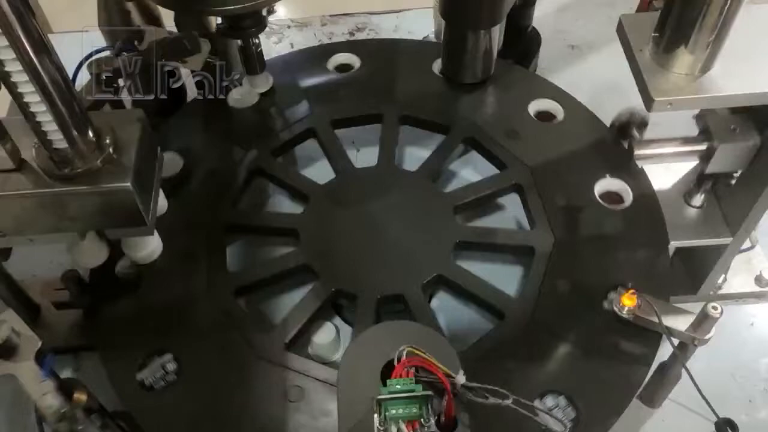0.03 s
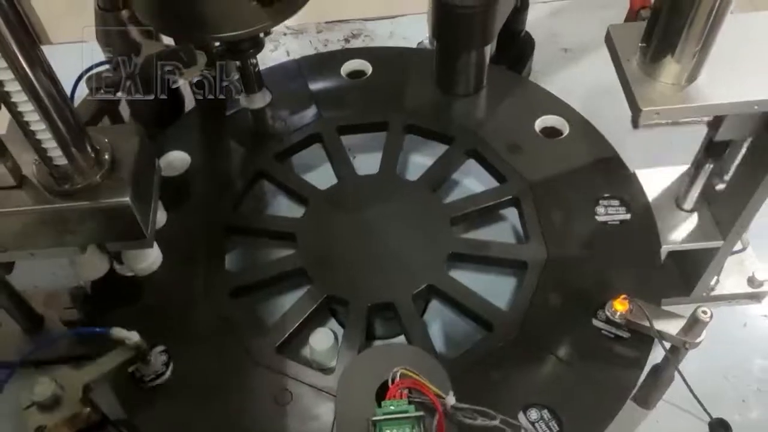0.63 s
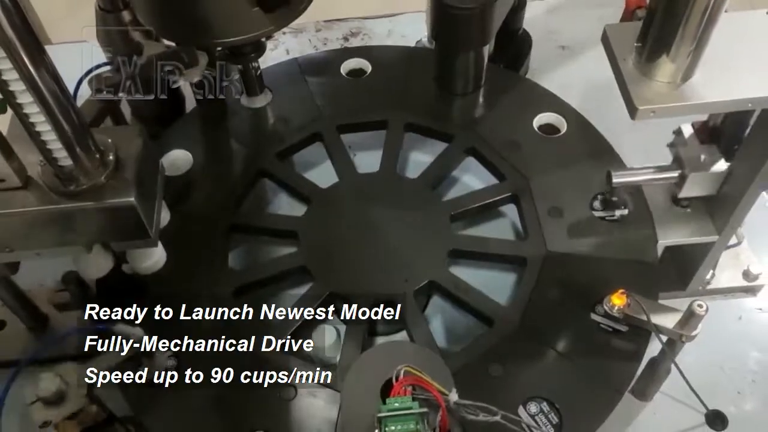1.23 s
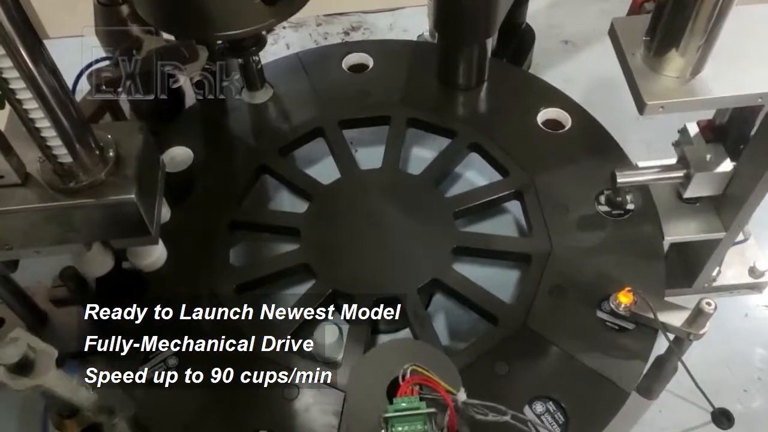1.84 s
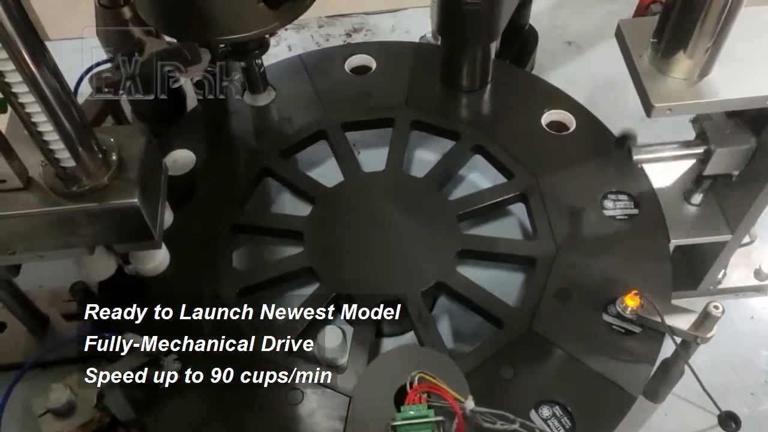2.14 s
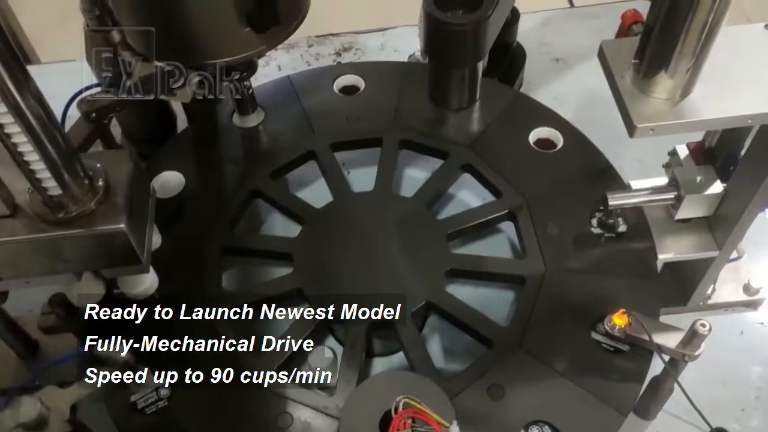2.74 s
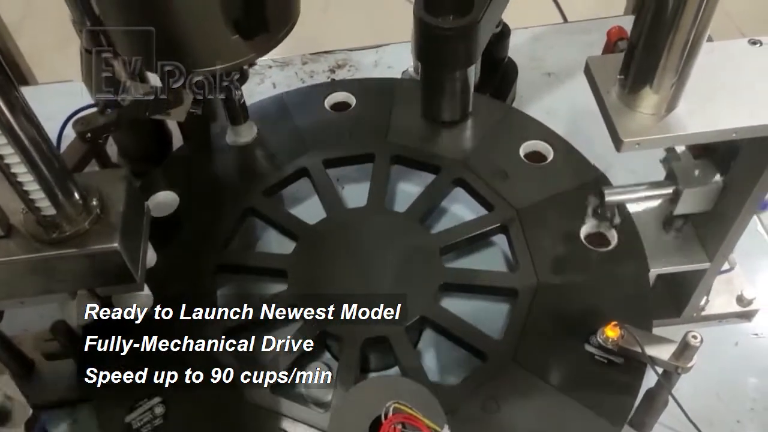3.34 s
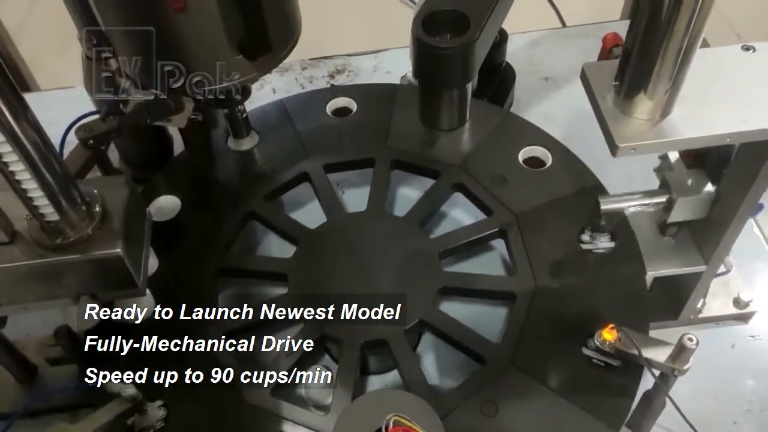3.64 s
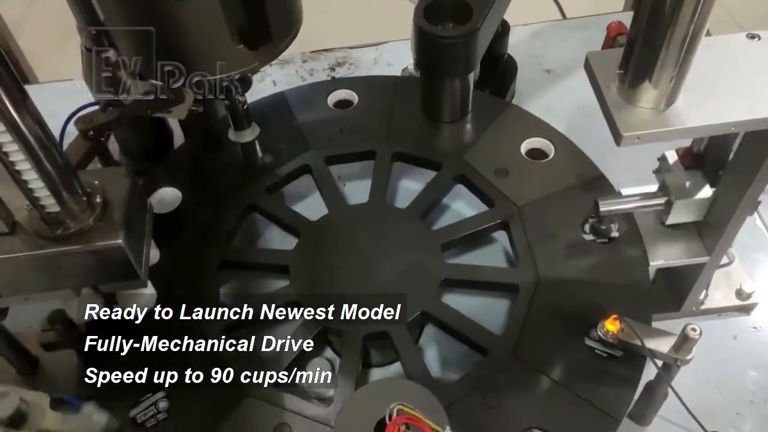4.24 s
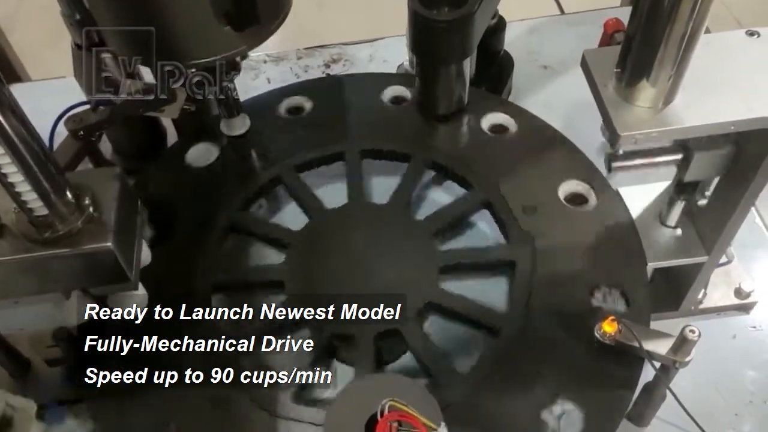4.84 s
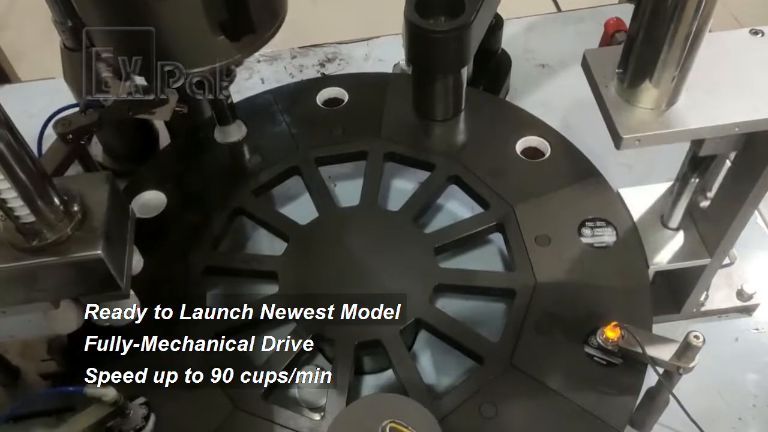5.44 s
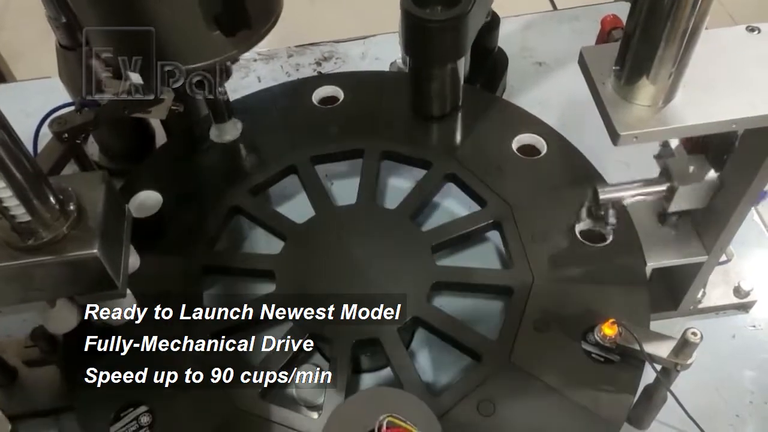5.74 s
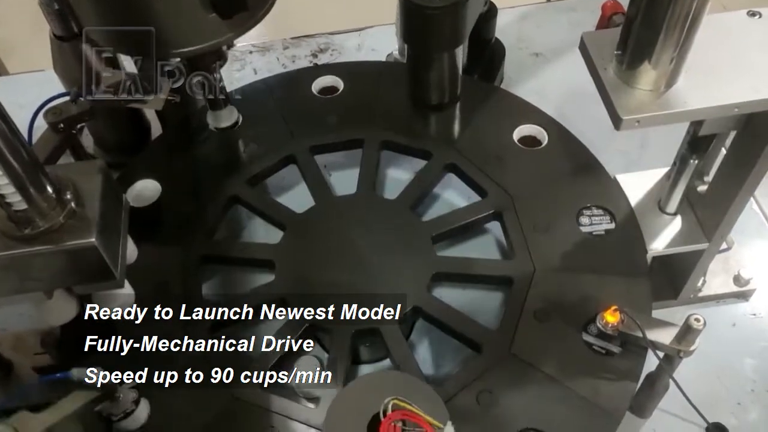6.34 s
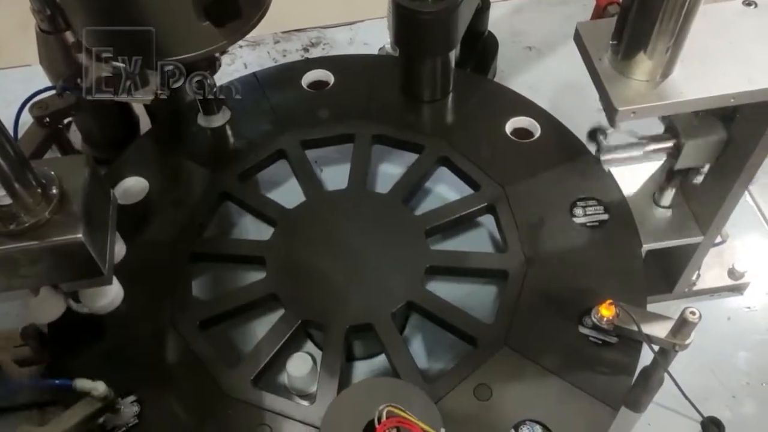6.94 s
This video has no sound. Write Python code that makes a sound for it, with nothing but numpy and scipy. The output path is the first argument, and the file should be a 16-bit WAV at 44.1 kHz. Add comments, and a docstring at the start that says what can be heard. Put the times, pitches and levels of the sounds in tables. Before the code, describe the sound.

A rotary packing machine runs close to the microphone in a factory hall. A little faster than once a second, its steel turntable locks with a rattling, ringing clack, the tools come down with a dull clunk, and a short burst of air follows. The motor and gears whirr steadily underneath. Small knocks, pings and a few brief squeaks fall between the beats, and two hollow pops stand out early on.

```python
"""Rotary capsule packing machine

Close up in a factory hall, the machine steps round about every 0.8 s: a rattling, ringing clack as the
turntable locks, a dull clunk as the tools come down, then a burst of air. Underneath, the drive whirrs
through the steel frame. Cams knock, a small part pings, a guide squeaks, twice something hollow pops."""
import sys
import numpy as np
from scipy import signal
from scipy.fft import rfft, irfft
from scipy.io import wavfile
from scipy.ndimage import uniform_filter1d

SR = 44100
rng = np.random.default_rng(int(sys.argv[2]) if len(sys.argv) > 2 else 0)


def pcm_store(signal):
    """Save signal as 16-bit PCM."""
    levels = np.round(np.clip(np.atleast_2d(signal), -1, 1) * 32767)
    wavfile.write(sys.argv[1], SR, levels.astype(np.int16).T)


N = 313110
TIME = np.arange(N) / SR
CYCLE_S = 0.7935  # one turn of the camshaft

# fade-in of the whole mix: (t/s, level/dB)
FADE_IN = [(.148, -20.5), (.2, -8), (.29, -5), (.34, -1.5), (.42, 0.5)]
# decay of the hall: (f/Hz, t60/s)
HALL_DECAY = [(150, 0.43), (500, 0.5), (1000, 0.46), (3000, 0.35), (9000, 0.05)]
# deep shaking of the floor: (t/s, relative level/dB)
FLOOR_SHAKE = [(0.3, -74), (1.76, -64), (1.8, -81), (2.14, -66.5), (2.29, -85.5), (2.69, -63), (3.18, -68),
               (4.56, -54), (5.3, -74), (5.9, -76), (7.1, -65)]
# motor and gear tones: (f/Hz, level/dB)
MOTOR_TONES = [(402, -52.5), (554, -50), (2566, -79), (2807, -56.5), (4151, -57.5)]
# load on the drive through a cycle: (t/s after the lock, whirr level/dB, sliding level/dB)
DRIVE_LOAD = [(.02, -36, -36.5), (.13, -36, -37.5), (.23, -38.5, -39.7), (.29, -38.5, -37),
              (.325, -36.5, -37.5), (.38, -38, -40), (.48, -37, -39), (.6, -39.5, -41.5),
              (.69, -39.5, -41.5), (.76, -39, -40)]
# slow drift of the whirr: (t/s, gain/dB)
GEAR_DRIFT = [(.4, 1.1), (.65, 1.5), (1, 1), (1.55, 0.5), (2.2, -0.5), (2.6, 1.8), (2.95, 1), (3.4, 1.5),
              (3.9, 0.5), (4.2, 1), (5.2, 1.5), (5.7, -0.1), (6.3, -1.1), (7, 0)]
# tone colours of the gears and the sliding guides: (f/Hz, relative level/dB)
GEAR_EQ = [(29, -61), (50, -44.5), (70, -26), (108, -14), (155, -18), (198, -6.5), (277, -6.5), (398, -3),
           (428, -4), (531, -3.5), (680, -10.5), (710, -8.5), (821, -6), (1130, -12.5), (1600, -51),
           (2080, -50), (3520, -120)]
GUIDE_EQ = [(650, -14.5), (1100, -1), (1380, -1), (1510, 0), (2370, 2), (3830, 0), (4350, -1.5), (6770, -3),
            (9920, -21), (10600, -42), (11100, -81.5), (11500, -91), (15000, -101), (22000, -120)]
# tone colours of the air jet, its fizz and the rush in the pipe: (f/Hz, relative level/dB)
JET_EQ = [(120, -8.5), (210, 9.5), (330, 7), (800, 2.5), (1300, -6.5), (1700, -7), (2700, 0), (3700, -3.5),
          (4500, -4.5), (6900, 1.5), (7400, -10), (10000, -13), (11500, -43)]
FIZZ_EQ = [(3000, -40), (6500, -10), (7800, -1.5), (10000, 0), (11500, -13)]
PIPE_EQ = [(600, -28), (1300, -14), (1700, -4), (2700, -1.5), (3700, -8), (4500, -7.5), (6900, -7.5),
           (8000, -31), (11500, -55)]
# tone colours of the clunk and the clack: (f/Hz, relative level/dB)
CLUNK_EQ = [(59, -37.5), (100, -8.5), (373, 6), (743, 8.5), (1170, 0.5), (1450, -6.5), (1910, -5.5),
            (2520, -10.5), (3590, -15), (6600, -9.5), (8030, -44), (9400, -22), (11000, -74), (14300, -83),
            (22000, -120)]
CLACK_EQ = [(59, -56), (100, -38), (203, -21), (837, -5), (1990, -13.5), (2470, -10.5), (3120, -6),
            (3380, -15.5), (4110, -10.5), (7720, -15.5), (8190, -29), (9780, -23), (11000, -83),
            (14300, -88), (22000, -120)]
# resonances of the frame, air pipe, tool head and turntable: (f/Hz, width/Hz, gain/dB)
FRAME_PEAKS = [(115, 22, 2.5), (205, 40, 3), (256, 16, 2.5), (300, 14, 4), (345, 30, 2.5), (402, 30, 3),
               (522, 30, 4), (555, 22, 5), (712, 35, 3), (800, 70, 3), (1070, 50, 3)]
PIPE_PEAKS = [(1765, 55, 6), (2565, 90, 6.5), (2680, 90, -3), (2803, 60, 7.5), (4410, 70, 6), (4650, 60, 5)]
TOOL_PEAKS = [(408, 220, 6.5), (783, 110, 0.5), (1460, 86, 7.5), (2500, 110, 11.5), (6200, 460, -8),
              (6840, 170, 10)]
TURNTABLE_PEAKS = [(850, 160, 3), (1470, 150, 2), (1720, 150, 3), (2150, 120, -5), (2350, 70, 4),
                   (2520, 90, 4), (2750, 100, -4), (3170, 140, -10), (3360, 70, 6), (3490, 80, 5),
                   (3640, 100, -7), (3815, 70, 5), (4000, 100, -6), (4570, 90, 5), (4900, 90, 6),
                   (5300, 90, 5), (5520, 200, -6), (6150, 150, 3), (7500, 500, -8)]
# how far a narrow band may swell, least in the low drone: (f/Hz, multiple of the usual swing)
SWELL_CEILING = [(600, .7), (1500, 1.5)]
# a dry guide squeaks: (t/s, length/s, start f/Hz, end f/Hz, level/dB)
GUIDE_SQUEAKS = [(0.813, 0.04, 7940, 8360, -40), (1.624, 0.028, 8200, 8550, -40),
                 (5.57, 0.045, 7840, 8500, -35.5)]
# cams and cups knock on hollow parts: (t/s, ring level/dB, f/Hz, t60/s, scrape level/dB)
CAM_KNOCKS = [(.44, -29, 1490, 0.035, -36), (.602, -25.5, 805, 0.04, -40), (.645, -26, 1040, 0.076, -34.5),
              (0.7201, -30, 1170, 0.03, -33), (.801, -27, 920, 0.032, -37), (.85, -25, 846, 0.037, -42),
              (1.255, -31, 1280, 0.038, -38), (1.396, -37, 2600, .04, -49), (2.057, -26, 1015, 0.037, -41),
              (2.06, -28, 1790, .03, -42), (2.253, -28, 1096, 0.036, -43), (2.328, -27, 680, 0.023, -35),
              (2.331, -23, 1250, 0.032, -29.5), (2.682, -32, 836, 0.016, -41),
              (2.759, -22, 470, 0.023, -45), (2.959, -27, 1510, 0.023, -30),
              (2.967, -23, 1635, 0.034, -27.5), (3.188, -27, 817, 0.037, -38), (3.567, -26, 2640, .05, -43),
              (3.708, -31.5, 1780, .03, -44.5), (3.835, -26.5, 1084, 0.034, -39.5),
              (3.931, -22, 855, 0.013, -35), (4.392, -31, 985, 0.044, -48), (4.607, -27, 830, 0.03, -30.5),
              (5.225, -26, 1390, 0.031, -36), (5.311, -25.5, 2540, 0.053, -45),
              (5.388, -25.5, 1040, 0.064, -33.5), (5.481, -23.5, 810, 0.043, -38),
              (5.92, -17, 600, 0.017, -34), (6.005, -28.5, 1680, 0.061, -38),
              (6.115, -22.5, 1730, 0.022, -31), (6.278, -31.5, 1050, 0.048, -52),
              (6.805, -30, 1340, 0.03, -34), (6.996, -30, 808, 0.041, -34), (7.08, -34, 1400, 0.039, -30)]
# modes of a loose part: (multiple of its pitch, relative level/dB)
PART_MODES = [(.53, -11), (.8, -11), (1, 0), (1.31, -12), (1.9, -15)]
# two hollow pops: (t/s, level/dB, f/Hz, snap gain/dB)
HOLLOW_POPS = [(0.7667, -7.5, 804, 1), (2.3719, -7, 817, 0.5)]
# modes of the popping cavity: (multiple of its pitch, relative level/dB, t60/s)
CAVITY_MODES = [(.84, -4, 0.022), (1, 15.5, 0.025), (1.14, -12, 0.0082), (1.6, -29, 0.009),
                (2.05, 1, 0.025)]
# the air valve opens: (t/s, flow level/dB)
AIR_BURSTS = [(.444, -36.5), (1.262, -36.5), (2.062, -36.5), (2.862, -35.5), (3.633, -36.5), (4.44, -35.5),
              (5.218, -37), (6.012, -36), (6.816, -36.5)]
# the tools touch softly, then seat hard; levels before trims: (t/s, touch level/dB, seat lag/s,
# seat level/dB, thump f/Hz, thump level/dB, ring f/Hz, ring level/dB, ping level/dB)
TOOL_STROKES = [(.359, -31, .0025, -29, 516, -16.5, 804, -18, -59),
                (1.163, -29, 0.0031, -31.5, 423, -26, 775, -24, -42),
                (1.962, -28.5, 0.015, -28.5, 693, -22, 870, -16, -26.5),
                (2.755, -31, 0.0195, -29, 476, -20, 968, -18, -56),
                (3.551, -29, 0.014, -29.5, 530, -27, 715, -12.5, -54),
                (4.353, -31.5, 0.0052, -30.5, 420, -16.5, 680, -17.5, -47),
                (5.143, -34, .004, -23.5, 690, -20, 1383, -9, -56),
                (5.905, -31, 0.0208, -25.5, 550, -21, 726, -11, -58),
                (6.709, -29, 0.013, -31, 495, -35, 910, -17, -34)]
# the turntable's lasting steel modes: (f/Hz, t60/s)
TURNTABLE_MODES = [(2350, .05), (2505, 0.075), (3420, 0.057), (3820, 0.045)]
# the turntable locks; levels before trims: (t/s, thud level/dB, knock level/dB, click level/dB,
# rise/s, decay/s, level/dB of each of the four steel modes, ping level/dB)
LOCKS = [(0.8679, -45, -26.5, -27.5, 0.00402, 0.0092, -35, -33, -20, -17.5, -43),
         (1.6705, -30, -24.5, -26.5, 0.0004, 0.014, -24, -27, -19, -27, -34),
         (2.4626, -40, -26, -25.5, 0.0083, .013, -29, -26, -24, -28, -51),
         (3.2572, -37, -25.5, -27.5, 0.0051, 0.013, -24, -31, -24, -25, -45),
         (4.0595, -29, -24.5, -27, 0.00049, .012, -21, -23, -30, -17, -37),
         (4.8611, -31.5, -25.5, -25, 0.0021, 0.0088, -24.5, -25, -24, -34, -44),
         (5.627, -34.5, -26.5, -26.5, 0.00072, 0.0095, -36, -37, -19, -23, -47),
         (6.4168, -29.5, -25, -26.5, 0.00028, .012, -30.5, -20, -20, -24, -36)]


def amp(db):
    """Decibels to amplitude."""
    return 10 ** (np.asarray(db) / 20)


def unit_rms(x):
    """Scales a signal to an RMS of one."""
    return x / np.sqrt(np.mean(x ** 2) + 1e-20)


def curve(points, hz):
    """Joins breakpoints with straight lines over log frequency."""
    f, value = np.transpose(points)
    return np.interp(np.log(hz + 1), np.log(f + 1), value)


def add(mix, s, sound):
    """Drops a sound into the mix at s seconds."""
    part = mix[max(round(s * SR), 0):][:len(sound)]
    part += sound[:len(part)]


def wander(rate_hz, size=32768):
    """Smooth random modulation of unit RMS, rolling off above rate_hz."""
    hz = np.fft.rfftfreq(size, N / SR / size)
    slow = irfft(rfft(rng.standard_normal(size)) / (1 + (hz / rate_hz) ** 4), size)
    return np.interp(TIME, np.linspace(0, N / SR, size), unit_rms(slow))


def body(x, eq, peaks=(), size=4096):
    """Plays x through a resonant body; minimum phase, so it rings only after it is struck."""
    hz = abs(np.fft.fftfreq(size, 1 / SR))
    resonances = sum(db / (1 + (2 * (hz - f) / width) ** 2) for f, width, db in peaks)
    log_gain = np.log(amp(np.maximum(curve(eq, hz) + resonances, -100)))
    response = np.fft.ifft(np.exp(np.conj(signal.hilbert(log_gain)))).real
    return signal.fftconvolve(x, response[:size // 2])[:len(x)]


def chatter(count, per_s, spread_db):
    """Tiny contacts of uneven size at random moments."""
    size = amp(spread_db * np.minimum(rng.exponential(1, count), 4))
    return unit_rms(size * rng.choice([-1, 1], count) * (rng.random(count) < per_s / SR))


def struck(t, rise_s, t60):
    """Envelope of a struck part: a rounded attack, then 60 dB of decay every t60 seconds."""
    return (1 - np.exp(-t / rise_s)) * amp(-60 * t / t60)


def cycle_time(opening_lock_s=0.045):
    """How far the camshaft has turned since the last lock, in seconds at its usual speed."""
    locks = [opening_lock_s] + [row[0] for row in LOCKS] + [LOCKS[-1][0] + CYCLE_S]
    return np.interp(TIME, locks, np.arange(len(locks))) % 1 * CYCLE_S


def hall(x, tails=3):
    """Diffuse reverb whose bass outlasts its treble; several tails crossfade so no pitch keeps ringing."""
    out = np.zeros(N)
    for k in range(tails):
        echoes = rng.standard_normal(SR) * (np.arange(SR) > SR // 200)  # 5 ms pre-delay
        hz, t, spectrum = signal.stft(echoes, SR, nperseg=256)
        decay = amp(-60 * t / curve(HALL_DECAY, hz)[:, None])
        tail = signal.istft(spectrum * decay, SR, nperseg=256)[1]
        send = np.sqrt(2 / tails) * np.cos(np.pi * (TIME + k / tails))
        out += signal.fftconvolve(x * send, tail / np.linalg.norm(tail))[:N]
    return out


def floor_rumble(trim_db=-4.5, centre_hz=39, width_hz=7):
    """The machine shakes on its feet: a narrow band of sub-bass."""
    hz = np.fft.rfftfreq(N, 1 / SR)
    resonance = rfft(rng.standard_normal(N)) / (1 + 2j * (hz - centre_hz) / width_hz)
    shake = irfft(resonance / (1 + (hz / centre_hz / 2) ** 4), N)
    return unit_rms(shake) * amp(np.interp(TIME, *np.transpose(FLOOR_SHAKE)) + trim_db)


def motor(blur_hz=11):
    """Gear tones, blurred in level and phase by uneven meshing."""
    hum = np.zeros(N)
    for hz, db in MOTOR_TONES:
        phase = 2 * np.pi * hz * TIME
        hum += amp(db) * (unit_rms(1 + wander(blur_hz)) * np.sin(phase) + wander(blur_hz) * np.cos(phase))
    return hum


def drive(ticks_db=-8, flutter_db=1.6):
    """Gears and chain chatter into the frame while the guides slide; both follow the load."""
    s, *levels = np.transpose(DRIVE_LOAD)
    whirr_db, slide_db = (np.interp(cycle_time(), s, db, period=CYCLE_S) for db in levels)
    whirr_db += np.interp(TIME, *np.transpose(GEAR_DRIFT))
    teeth = chatter(N, per_s=2500, spread_db=2.3)
    gears = unit_rms(body(teeth, GEAR_EQ, FRAME_PEAKS)) * amp(.4 * wander(6.7))
    rubbing = rng.standard_normal(N) + amp(ticks_db) * chatter(N, per_s=300, spread_db=1.4)
    guides = unit_rms(body(rubbing, GUIDE_EQ, [(2670, 2700, 0.72)])) * amp(flutter_db * wander(11))
    return gears * amp(whirr_db) + guides * amp(slide_db)


def moving_steel(x, depth_db=3.0, span_hz=125, span_s=0.12):
    """Moving steel parts pick out and cancel narrow bands for a moment."""
    hz, t, spectrum = signal.stft(x, SR, nperseg=1024, noverlap=768)
    across, along = np.fft.fftfreq(len(hz), hz[1])[:, None], np.fft.fftfreq(len(t), t[1])
    blur = np.exp(-(across * span_hz) ** 2 - (along * span_s) ** 2)
    patches = unit_rms(np.fft.ifft2(np.fft.fft2(rng.standard_normal(spectrum.shape)) * blur).real)
    gain = amp(depth_db * np.minimum(patches, curve(SWELL_CEILING, hz)[:, None]))
    gain /= np.sqrt(np.mean(gain ** 2, axis=1, keepdims=True))  # each band keeps its average power
    return signal.istft(spectrum * gain, SR, nperseg=1024, noverlap=768)[1][:N]


def jingle(level_db=-48, low_hz=2100, high_hz=6500, parts=36):
    """Springs, pins and washers tick at random, each at its own pitch, as hard as the guides slide."""
    t, out = np.arange(SR // 10) / SR, np.zeros(N)
    for hz in np.geomspace(low_hz, high_hz, parts) * rng.uniform(.985, 1.015, parts):
        tick = struck(t, rise_s=0.00054, t60=0.052) * np.sin(2 * np.pi * hz * t)
        out += signal.oaconvolve(chatter(N, per_s=9, spread_db=3), tick)[:N]
    s, _, slide_db = np.transpose(DRIVE_LOAD)
    swing_db = np.interp(cycle_time(), s, slide_db - slide_db.mean(), period=CYCLE_S)
    return unit_rms(out) * amp(level_db + swing_db)


def guide_squeaks(roughness=0.0093):
    """A dry guide gives short upward squeaks, roughened by pitch jitter."""
    out, jitter = np.zeros(N), 1 + roughness * wander(490)
    for s, length, from_hz, to_hz, db in GUIDE_SQUEAKS:
        along = np.clip((TIME - s) / length, 0, 1)
        turns = np.cumsum((from_hz + (to_hz - from_hz) * along) * jitter) / SR
        out += amp(db) * np.sin(np.pi * along) * np.sin(2 * np.pi * turns)
    return out


def pings(hz=7537, twin_hz=7575, twin_db=-13, lag_s=.004):
    """Every clack and clunk jolts a close, beating pair of modes in a small steel part."""
    t, out = np.arange(SR // 2) / SR, np.zeros(N)
    tone = np.sin(2 * np.pi * hz * t) + amp(twin_db) * np.sin(2 * np.pi * twin_hz * t)
    for s, *_, db in LOCKS + TOOL_STROKES:
        add(out, s + lag_s, amp(db) * struck(t, rise_s=0.0013, t60=0.23) * tone)
    return out


def cam_knocks(rise_s=0.00099, rebound_db=-7, rebound_s=0.028):
    """A soft blow rings a loose part, which rebounds; the scrape swells more slowly and lingers."""
    t, out = np.arange(SR // 6) / SR, np.zeros(N)
    for s, ring_db, hz, t60, scrape_db in CAM_KNOCKS:
        modes = sum(amp(db) * np.sin(2 * np.pi * hz * k * t) for k, db in PART_MODES)
        force = chatter(len(t), per_s=700, spread_db=2) * np.exp(-t / rebound_s) * (t > .004)
        force *= amp(rebound_db) / np.linalg.norm(force)
        force[0] = 1  # the blow ahead of the rebounds
        ringing = signal.fftconvolve(force, struck(t, rise_s, t60) * modes)[:len(t)]
        sliding = struck(t, rise_s=0.0021, t60=2 * t60)
        scrape = unit_rms(body(chatter(len(t), per_s=2500, spread_db=3.1), CLACK_EQ, TURNTABLE_PEAKS))
        add(out, s, amp(ring_db) * ringing / abs(ringing).max())
        add(out, s, amp(scrape_db) * sliding / sliding.max() * scrape)
    return out


def hollow_pops(rise_s=0.0011, crack_db=-15, crack_s=0.0087, clatter_db=-34, clatter_s=0.11):
    """A cavity pops close by, rings briefly and leaves the parts around it clattering."""
    t, out = np.arange(SR // 5) / SR, np.zeros(N)
    for s, db, hz, snap_db in HOLLOW_POPS:
        tone = -sum(amp(mode_db) * struck(t, rise_s, t60) * np.sin(2 * np.pi * hz * k * t)
                    for k, mode_db, t60 in CAVITY_MODES)
        shake = amp(crack_db + snap_db) * np.exp(-t / crack_s) + amp(clatter_db) * np.exp(-t / clatter_s)
        noise = body(rng.standard_normal(len(t)), CLACK_EQ, [(1500, 1800, 18), (4470, 1200, 9.9)])
        crack = unit_rms(noise) * shake * (1 - np.exp(-t / rise_s))
        add(out, s, amp(db) * (tone / abs(tone).max() + crack))
    return out


def air_valve(burst_s=0.24, open_s=0.071, shut_s=0.08, flutter_hz=27.8, flutter_db=0.8,
              jet_db=-2, fizz_db=-10.5, pipe_db=-3, pipe_lag_s=0.017):
    """A valve lets out a turbulent jet once a cycle; the pipe's resonances build up just behind it."""
    gusts = wander(flutter_hz)
    turbulence = amp(flutter_db * unit_rms(gusts - uniform_filter1d(gusts, SR // 10)))
    flow = np.zeros(N)
    for s, db in AIR_BURSTS:
        t = TIME - s
        lift = np.clip(t / open_s + .5, 0, 1) * np.clip((burst_s - t) / shut_s + .5, 0, 1)
        swell_db = np.sin(np.pi * np.clip(t / burst_s, 0, 1)) - 2 / np.pi
        flow += np.sin(np.pi / 2 * lift) ** 2 * amp(db + swell_db)
    jet = unit_rms(body(rng.standard_normal(N) * turbulence, JET_EQ))
    pipe = unit_rms(body(rng.standard_normal(N) * turbulence, PIPE_EQ, PIPE_PEAKS))
    fizz = unit_rms(body(rng.standard_normal(N) * turbulence, FIZZ_EQ))
    fizz *= (flow / flow.max()) ** 2  # comes in only near full flow
    pipe_flow = np.interp(TIME - pipe_lag_s, TIME, flow)
    return flow * (jet * amp(jet_db) + fizz * amp(fizz_db)) + pipe_flow * pipe * amp(pipe_db)


def impacts(rows, eq, peaks, trims_db, run_up_db, run_up_s, blow_db, tail_db, tail_s):
    """Parts scrape closer, meet and rattle to rest: a low thud, a mid knock and a high click."""
    lead, count = SR // 10, SR // 2
    t, hz = (np.arange(count) - lead) / SR, np.fft.rfftfreq(count, 1 / SR)
    lows, lows_and_mids = (1 / (1 + (hz / edge_hz) ** 8) for edge_hz in (600, 1600))
    bands = np.array([lows, lows_and_mids - lows, 1 - lows_and_mids])
    attack = (t > 0) & (t < .02)  # band levels are set over this stretch
    after, out = np.maximum(t, 0), np.zeros(N)
    for s, *levels_db, rise_s, decay_s in rows:
        grip = 1 - np.exp(-after / rise_s)
        run_up = amp(run_up_db) * (1 - grip) * np.exp(-abs(t) / run_up_s)
        rattle = grip * np.exp(-after / decay_s)
        tail = amp(tail_db) * grip * np.exp(-after / tail_s)
        force = chatter(count, per_s=6000, spread_db=1.7) * (run_up + rattle / rattle.max() + tail)
        force[lead + rattle.argmax() // 2] += amp(blow_db) * np.linalg.norm(force)  # one hard contact
        favoured = [(f, width, db * rng.uniform(0.34, 1.8)) for f, width, db in peaks]  # varies per hit
        layers = irfft(rfft(body(force, eq, favoured)) * bands, count)
        gains = amp(np.add(levels_db, trims_db)) / layers[:, attack].std(1)
        add(out, s - lead / SR, gains @ layers)
    return out


def tool_rings():
    """The tool that seats hardest gives a compact low thump and a brief ring above it."""
    t, out = np.arange(SR // 6) / SR, np.zeros(N)
    push = struck(t, rise_s=0.0013, t60=0.019)
    for s, _, lag_s, _, thump_hz, thump_db, ring_hz, ring_db, _ in TOOL_STROKES:
        thump = amp(thump_db) * push / push.max() * np.sin(2 * np.pi * thump_hz * t)
        ring = amp(ring_db) * struck(t, rise_s=0.0016, t60=0.02) * np.sin(2 * np.pi * ring_hz * t)
        add(out, s + lag_s, thump + ring)
    return out


def tool_clunks(touch_rise_s=0.0034, touch_decay_s=0.012, seat_rise_s=.0007, seat_decay_s=0.0072):
    """Each stroke of the tools is a dull touch and, just after it, a sharper knock as they seat."""
    touches = [(s, db, db, db, touch_rise_s, touch_decay_s) for s, db, *_ in TOOL_STROKES]
    seats = [(s + lag_s, db, db, db, seat_rise_s, seat_decay_s) for s, _, lag_s, db, *_ in TOOL_STROKES]
    touch = impacts(touches, CLUNK_EQ, TOOL_PEAKS, trims_db=[-3.3, -11.5, -9],
                    run_up_db=-6, run_up_s=0.012, blow_db=-17, tail_db=-25, tail_s=0.031)
    seat = impacts(seats, CLUNK_EQ, TOOL_PEAKS, trims_db=[-7, -3.5, -10.5],
                   run_up_db=-7, run_up_s=0.0069, blow_db=-20, tail_db=-23, tail_s=0.019)
    return touch + seat


def turntable_ring(rise_s=0.0016, trim_db=-3):
    """The turntable rings after each lock, with a balance of modes that depends on the station."""
    t, out = np.arange(SR // 3) / SR, np.zeros(N)
    for s, _, _, _, grip_s, _, *levels_db, _ in LOCKS:
        for (hz, t60), db in zip(TURNTABLE_MODES, levels_db):
            tone = np.sin(2 * np.pi * (hz * rng.uniform(.992, 1.008) * t + rng.random()))
            add(out, s + grip_s / 2, amp(db + trim_db) * struck(t, rise_s, t60) * tone)
    return out


def turntable_clacks():
    """The turntable runs into its lock and rattles."""
    return impacts([row[:6] for row in LOCKS], CLACK_EQ, TURNTABLE_PEAKS, trims_db=[-4, -3, -5],
                   run_up_db=-7.5, run_up_s=0.024, blow_db=-16.5, tail_db=-13.5, tail_s=0.031)


def scene(hits_send_db=-12, near_send_db=-22):
    """The machine in its hall, centred in two channels; close parts send less to the reverb."""
    hits = turntable_clacks() + tool_clunks() + tool_rings()
    near = hollow_pops() + cam_knocks() + turntable_ring()
    reverb = hall(amp(hits_send_db) * hits + amp(near_send_db) * near)
    bed = moving_steel(drive() + air_valve()) + jingle() + motor() + floor_rumble()
    return np.array([reverb + bed + guide_squeaks() + pings() + near + hits] * 2)


def record(dry, start_s=.147, cutoff_hz=11500):
    """The mix fades in after a moment of silence; a steep low-pass takes off the top."""
    faded = dry * amp(np.interp(TIME, *np.transpose(FADE_IN))) * (TIME > start_s)
    low_pass = signal.firwin(511, cutoff_hz, window=("kaiser", 9), fs=SR)
    return signal.oaconvolve(faded, low_pass[None], "same")


dry = scene()
out = record(dry)
pcm_store(out)
```